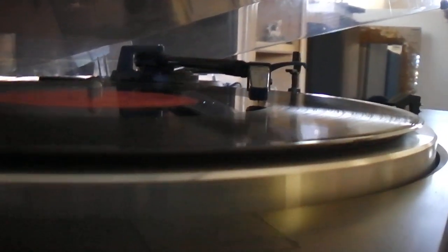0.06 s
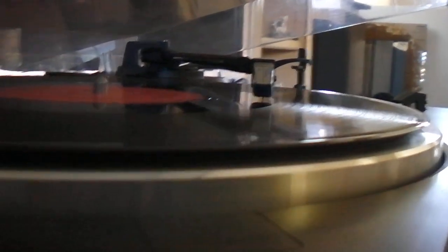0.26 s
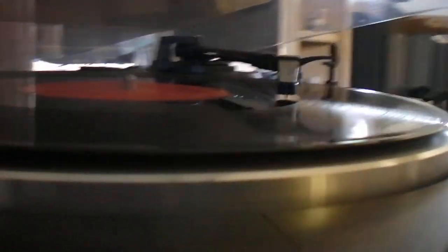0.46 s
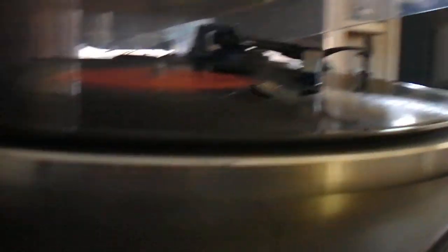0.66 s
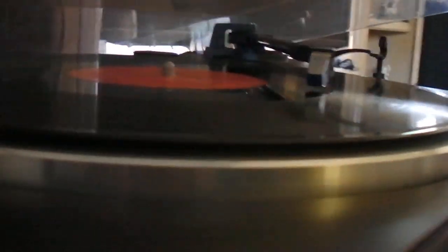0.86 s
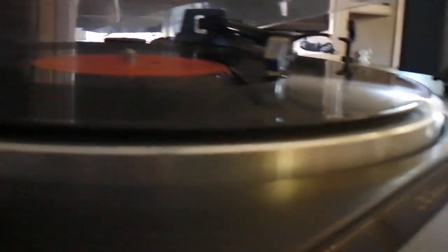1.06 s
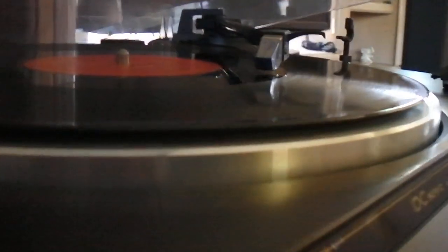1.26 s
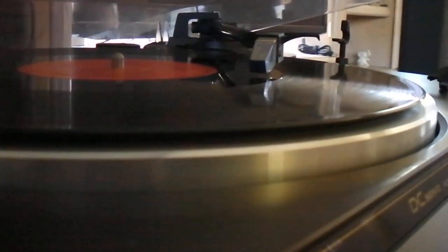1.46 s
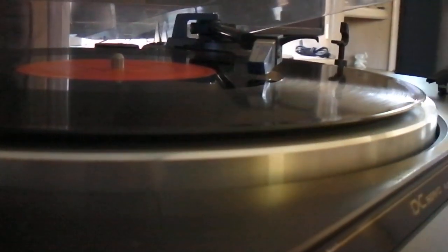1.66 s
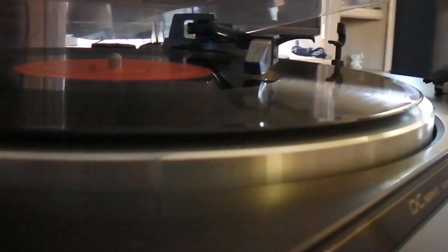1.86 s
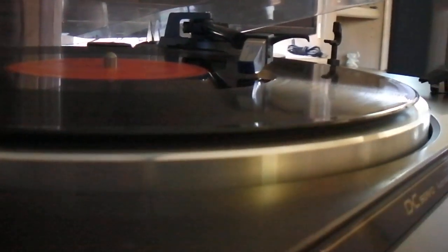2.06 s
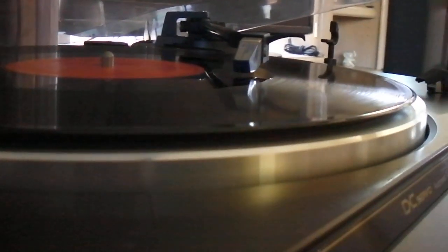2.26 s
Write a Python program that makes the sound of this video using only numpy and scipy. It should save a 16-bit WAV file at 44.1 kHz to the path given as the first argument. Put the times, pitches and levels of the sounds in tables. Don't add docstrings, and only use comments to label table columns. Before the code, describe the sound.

Vinyl record crackle: sharp dry clicks and pops from a dusty silent groove over faint motor whir

```python
import sys
import numpy as np
from scipy import signal
from scipy.fft import rfft, irfft
from scipy.io import wavfile
from scipy.ndimage import uniform_filter1d

SR = 44100
rng = np.random.default_rng(int(sys.argv[2]) if len(sys.argv) > 2 else 0)


def attenuation_scalar(level_db):
    decades = np.asarray(level_db, float) / 20
    return 10 ** decades


def to_wav(sig):
    pcm = np.clip(np.atleast_2d(sig), -1, 1) * 32767
    pcm = np.round(pcm).astype(np.int16)
    wavfile.write(sys.argv[1], SR, pcm.T)


N = 103635
SIDE = np.array([[0.5], [-0.5]])

# pitch_hz, level_db, t60_s (time to fall 60 dB), left_over_right_db
STYLUS = [(8150, -7.5, 0.0045, 3.5), (9200, -4, 0.0026, -12), (9910, -14.5, 0.0073, -12),
          (13700, -20.5, 0.0063, -2), (14700, -35, .003, -11)]
# pitch_hz, level_db, t60_s, left_over_right_db
ARM = [(750, -11.5, 0.013, -1.3), (1310, -7, 0.036, -1), (1750, -7, 0.036, 0.79)]


def colour(x, points):
    p = np.array(points)
    hz = np.fft.rfftfreq(x.shape[-1], 1 / SR) + 1
    gain_db = np.interp(np.log(hz), np.log(p[:, 0]), p[:, 1])
    return irfft(rfft(x) * attenuation_scalar(gain_db), x.shape[-1])


def unit(x):
    return x / np.sqrt(np.mean(x ** 2))


def pair(size, like):
    noise = rng.standard_normal((3, size))
    like = np.clip(like, 0, 1)
    return np.sqrt(like) * noise[0] + np.sqrt(1 - like) * noise[1:]


def walk(rate_hz):
    k = int(SR / rate_hz)
    steps = np.repeat(rng.standard_normal(N // k + 1), k)
    return 1.08 * uniform_filter1d(uniform_filter1d(steps, k), k)[:N]


def add(out, s, x):
    i = int(s * SR)
    out[..., i:i + x.shape[-1]] += x[..., :max(N - i, 0)]


LEAD_IN_S = 0.002


def ring(modes, chance):
    click_lag_s, burst_s, burst_cycles = 9.5e-5, 0.00011, 0.42
    ring_db, longest_ring_s = -7, 0.011
    scatter_db, detune, phase_spread = 1.5, 0.02, 0.6
    rattle_db, rattle_t60_s, rattle_rise_s = -11.5, 0.017, 0.00041
    u = np.arange(2048) / SR
    t = u - LEAD_IN_S + click_lag_s * SIDE
    out = 0
    for (hz, db, t60, pan_db), (a, b) in zip(modes, chance[:2 * len(modes)].reshape(-1, 2)):
        burst = np.exp(-(t / (burst_s + burst_cycles / hz)) ** 2)
        fade = 1000 ** (-abs(t) / min(t60, longest_ring_s))
        shape = burst + (t > 0) * (1 - burst) * attenuation_scalar(ring_db) * fade
        phase = 2 * chance[20] + phase_spread * b
        tone = np.cos(2 * np.pi * hz * (1 + detune * a) * t + phase)
        out = out + attenuation_scalar(db + scatter_db * b + pan_db * SIDE) * shape * tone
    rattle = chance[-2048:] * 1000 ** (-u / rattle_t60_s) * (1 - np.exp(-(u / rattle_rise_s) ** 2))
    rattle = rattle * attenuation_scalar(rattle_db) / 5
    return out + signal.fftconvolve(out, rattle[None])[:, :2048]


def speck_ticks():
    # start_s, tip_db, bar_db, cartridge_db, pop_db (arm and loudspeakers)
    specks = [(0.0219, -38, -41.0, -60, -48.5), (0.0573, -49.5, -46.5, -68, -72),
              (0.1065, -34.5, -38.5, -53, -62), (0.1503, -44, -48, -63, -54),
              (0.2147, -41, -38, -55, -40.5), (0.238, -33, -35, -43.5, -48.5), (0.2703, -26, -26, -40, -63),
              (0.4003, -26.5, -32.5, -30.5, -43.5), (0.4383, -31, -28, -43, -40),
              (0.519, -21, -20, -19, -23), (0.6194, -21.5, -24, -52, -35), (0.6932, -19, -23.5, -30, -45),
              (0.7915, -37, -42.5, -49, -52), (0.8716, -24, -19, -17.5, -38), (0.89, -35, -36, -31.5, -50),
              (0.9561, -44.5, -42, -52, -44), (0.9672, -52, -53.5, -57.5, -47),
              (0.9734, -21.5, -24, -21, -37), (0.994, -24.5, -29.5, -24, -55),
              (1.035, -39, -44, -39, -54.0), (1.053, -38, -42, -48, -65), (1.0734, -32.5, -40, -40, -50),
              (1.1405, -9, -21, -14.5, -32.5), (1.2002, -24, -26.5, -32.5, -38),
              (1.2377, -39, -44, -41, -60), (1.323, -73, -61, -72, -72), (1.4603, -29.5, -36, -37.0, -47.5),
              (1.5476, -33, -39, -26.5, -41.0), (1.5872, -29.5, -38, -40, -62),
              (1.66, -42, -48, -60.0, -59.0), (1.7477, -17, -28, -29.5, -41.5),
              (1.7962, -30.5, -32.5, -36, -51), (1.9366, -29, -33.5, -34.5, -62),
              (1.9518, -30, -35, -37, -55), (2.0947, -25, -23.5, -28, -42), (2.1243, -34, -43.0, -45, -48),
              (2.1837, -42.5, -44.0, -44, -61), (2.2277, -29.5, -43, -43, -54.5)]
    # pitch_hz, level_db, t60_s, left_over_right_db
    bar = [(5720, -3, 0.0055, -2.5), (7030, -1.5, 0.0017, -8.5)]
    # pitch_hz, level_db, t60_s, left_over_right_db
    cartridge = [(2374, -5, 0.014, 4.5), (3620, -17, 0.021, 18.5), (4090, -1.5, 0.0028, -8.5),
                 (5000, -6.5, 0.0062, -1)]
    near, feed = np.zeros((2, N)), np.zeros(N)
    for (s, tip_db, bar_db, body_db, pop_db), c in zip(specks, rng.standard_normal((len(specks), 4, 2080))):
        tick = attenuation_scalar(tip_db + 4.5) * ring(STYLUS, c[0])
        tick = tick + attenuation_scalar(body_db + 5) * ring(cartridge, c[1])
        tick = tick + attenuation_scalar(pop_db + 7) * ring(ARM, c[2])
        tick = tick + attenuation_scalar(bar_db + 6.5) * ring(bar, c[3])
        add(near, s - LEAD_IN_S, tick)
        add(feed, s, attenuation_scalar(pop_db + 6) * np.ones(1))
    return near, feed


def scrapes():
    # start_s, level_db, length_s, pop_db
    scrape_times = [
        (0.2185, -35.5, 0.033, 5),
        (0.4436, -39, 0.012, 5.5),
        (0.639, -39, 0.015, 2),
        (1.8985, -39.5, 0.024, 7),
    ]
    # pitch_hz, level_db
    scrape_tone = [(300, -38), (1200, -30), (2000, -6.5), (4500, 8), (7000, -4), (9500, -6), (13000, -42)]
    rub, feed = np.zeros((2, N)), np.zeros(N)
    for s, db, length_s, pop_db in scrape_times:
        rough = rng.standard_normal(4096)
        grit = attenuation_scalar(db) * unit(rough * abs(rough)) * np.exp(-np.arange(4096) / SR / length_s)
        add(feed, s, attenuation_scalar(pop_db) * grit[:220] / np.sqrt(220))
        add(rub, s, np.array([grit, np.roll(grit, 4)]))
    return colour(rub, scrape_tone) * attenuation_scalar(2.5), feed


def arm_thumps():
    # start_s, level_db
    thumps = [
        (1.902, -40),
        (1.9125, -27),
        (1.9165, -37),
    ]
    near = np.zeros((2, N))
    for s, db in thumps:
        add(near, s - LEAD_IN_S, attenuation_scalar(db) * ring(ARM, rng.standard_normal(2080)))
    return near


def fine_dust():
    per_s, floor_db, spread_db, most_db = 30, -58, 3.5, 17
    chance = rng.random((2, N))
    extra_db = np.minimum(-spread_db * np.log(chance[1] + 1e-9), most_db)
    dust = (chance[0] < per_s / SR) * attenuation_scalar(floor_db + extra_db)
    return signal.fftconvolve(dust[None], ring(STYLUS, rng.standard_normal(2080)))[:, :N]


def room(late_s, first_db, t60_s):
    t = np.arange(SR) / SR - late_s
    first = attenuation_scalar(first_db) * np.exp(-(t / 0.011) ** 4)
    return pair(SR, 0.98) * (t > 0) * (1000 ** (-t / t60_s) + first)


def loudspeakers(feed):
    # pitch_hz, level_db
    speaker_tone = [(100, -28), (300, -10), (700, -4), (1300, 0.5), (2400, -9), (2800, -18.5),
                    (6000, -25.5), (12000, -72)]
    echo = colour(room(0.0135, 5.5, 0.84), speaker_tone) * attenuation_scalar(-3.5 - 4.0 * SIDE)
    return signal.fftconvolve(feed[None], echo)[:, :N]


def wall_echo(near):
    walls = room(0.0042, 0.45, 0.77) * attenuation_scalar(-30) / 10
    return signal.fftconvolve(near[:1], walls)[:, :N]


def groove():
    ticks, tick_feed = speck_ticks()
    rubs, rub_feed = scrapes()
    near = ticks + rubs + arm_thumps() + fine_dust()
    return near + loudspeakers(tick_feed + rub_feed) + wall_echo(near)


def motor():
    # share_of_turn (0 to 1), level_db, treble_db
    knocks = [
        (0., 6, 4.5),
        (0.451, 2, -2),
        (0.722, -28.5, -25),
    ]
    # pitch_hz, level_db, t60_s
    housing = [(387, -15, 0.12), (484, -19.5, 0.19), (522, -19.5, 0.25), (734, -20.5, 0.27),
               (812, -18, 0.21), (890, -11.5, 0.46), (909, -6, 0.22), (948, -11, 0.56), (1170, 5.5, 0.078),
               (1360, -27, 0.046), (1708, -10.5, 0.039), (1868, -11.5, 0.045), (2060, -6.5, 0.042),
               (2305, -11, 0.026)]
    turn_hz, first_knock_s, scatter_db = 19.345, 0.0425, 0.5
    t, out = np.arange(8192) / SR, np.zeros(N)
    turns = first_knock_s + np.arange(-2, 46) / turn_hz
    tap = 1 - np.exp(-(t / 0.001) ** 2)
    swell = (1 - np.exp(-(t / 0.0045) ** 2)) * (np.exp(-(t / 0.016) ** 4) + attenuation_scalar(-13))
    start = rng.random(len(housing))
    for share, db, treble_db in knocks:
        train = np.zeros(N + 2 * SR)
        at = ((turns + share / turn_hz + 1) * SR).astype(int)
        train[at] = attenuation_scalar(db + scatter_db * rng.standard_normal(len(turns)))
        body = np.zeros(len(t))
        for (hz, mode_db, t60), p in zip(housing, start):
            push = swell if hz > 850 else tap
            if hz > 1500:
                push = attenuation_scalar(treble_db) * tap
            cycles = round(hz / turn_hz) * (turn_hz * t + share) + p
            body += push * attenuation_scalar(mode_db) * np.sin(2 * np.pi * cycles) * 1000 ** (-t / t60)
        out += signal.fftconvolve(train, body)[SR:SR + N]
    both = np.array([out, np.roll(out, 3)])
    return unit(both) * attenuation_scalar(-46.5 - 0.5 * SIDE)


def room_air():
    # pitch_hz, level_db
    air_tone = [(20, -13), (170, -11), (500, 1), (1000, -5.5), (1400, -8.5), (3000, -11), (10000, -16.5),
                (16500, -27)]
    # pitch_hz, level_db
    air_apart = [(20, -2), (150, -1), (500, -10), (1500, -6), (4000, -2), (12000, -4)]
    mid, apart = rng.standard_normal((2, N))
    noise = mid + 2 * SIDE * colour(apart, air_apart)
    return unit(colour(noise, air_tone)) * attenuation_scalar(-49 + 1.0 * walk(2.54))


def groove_hiss():
    hz = np.fft.rfftfreq(N, 1 / SR)
    peak = np.exp(-((hz - 9000) / 2500) ** 2)
    hiss = irfft(rfft(pair(N, 0.33)) * peak, N)
    return unit(hiss) * attenuation_scalar(-86 + 2.0 * walk(17) - 1.0 * SIDE)


def mains_hum():
    # pitch_hz, level_db
    hum_tones = [(117.1, -67.5), (237.4, -68), (187, -76)]
    t, hum = np.arange(N) / SR, np.zeros(N)
    for hz, db in hum_tones:
        hum += attenuation_scalar(db + 3 + 1.43 * walk(5.2)) * np.sin(2 * np.pi * hz * t + 0.63 * walk(3.49))
    return hum


def background():
    port_lag_s, top_hz, edge_hz = 0.0001, 14300, 200
    hz = np.fft.rfftfreq(N, 1 / SR)
    lag = np.exp(2j * np.pi * hz * port_lag_s * SIDE)
    top = 1 + np.exp((hz - top_hz) / edge_hz)
    both = irfft(rfft(room_air() + groove_hiss()) * lag / top, N)
    return (both + mains_hum()) * attenuation_scalar(-1.5 * SIDE)


def scene():
    return groove() + motor() + background()


def roll_off(x):
    return signal.sosfilt(signal.butter(12, 16980, fs=SR, output="sos"), x)


def record(dry):
    x = signal.lfilter(*signal.iirnotch(7900, 30, SR), dry)
    ceiling = 0.93
    x = x / (1 + (x / ceiling) ** 6) ** (1 / 6) + 0.0028
    x = signal.sosfilt(signal.ellip(8, 0.2, 60, 16800, fs=SR, output="sos"), x)
    return roll_off(x)


dry = scene()
out = record(dry)
to_wav(out)
```